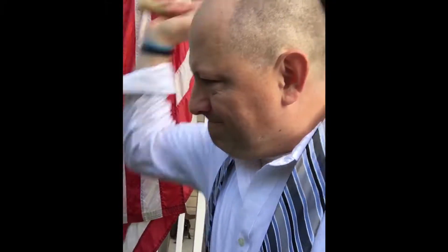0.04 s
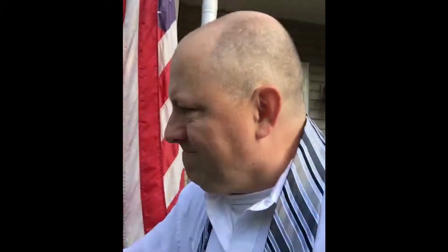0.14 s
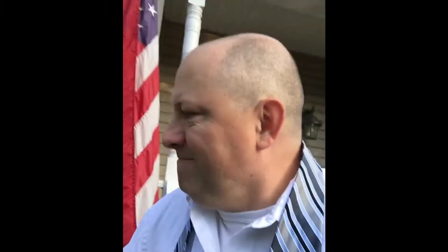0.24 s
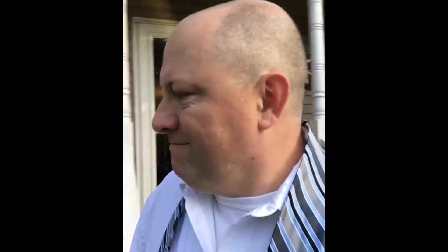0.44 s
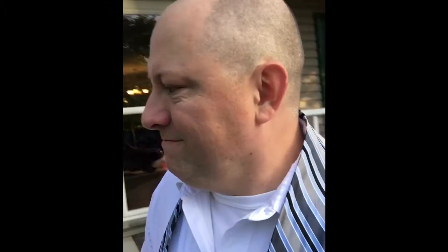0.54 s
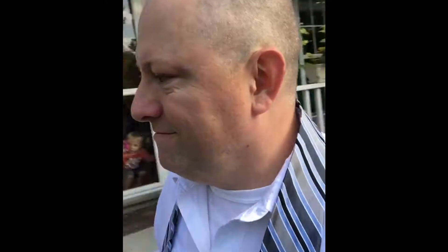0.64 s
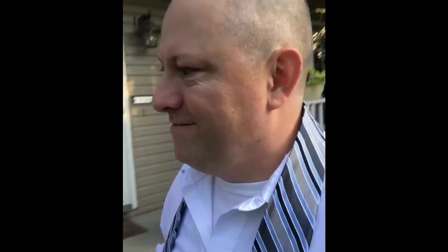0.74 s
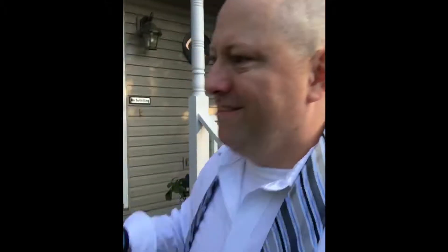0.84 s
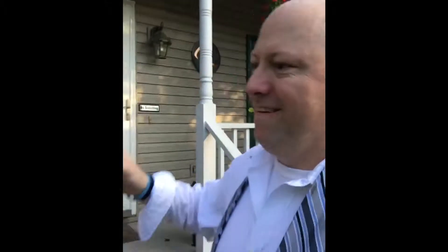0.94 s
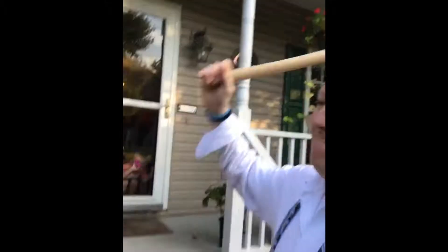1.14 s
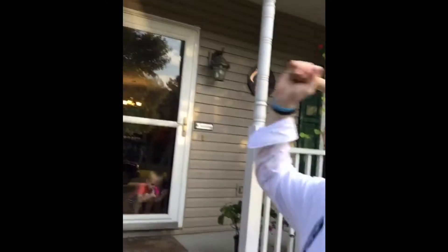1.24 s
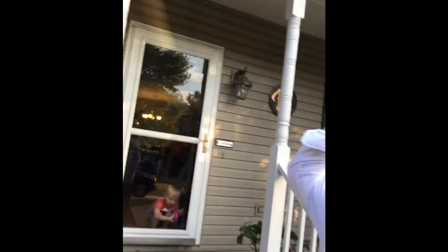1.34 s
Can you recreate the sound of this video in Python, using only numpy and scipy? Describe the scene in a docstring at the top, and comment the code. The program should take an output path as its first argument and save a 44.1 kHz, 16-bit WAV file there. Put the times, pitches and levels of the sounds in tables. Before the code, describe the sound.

Sharp, loud crack of a wooden stick bursting an object on a porch, crickets chirping behind

```python
"""A wooden stick smacks something on a porch, which bursts and scatters: noise bursts plus ringing tones.
Two clear ticks (decaying tones and noise) and a low whoosh (a gliding tone and soft noise) lead to it.
The house throws the blow back as scattered echoes; a spray of noise and random clicks hisses and patters,
a faint clink rings, and something lands with a dull thud (damped tones and low noise).
A cricket trills throughout in short falling chirps, over a faint chorus and quiet outdoor air."""
import sys
import numpy as np
from scipy import signal
from scipy.fft import rfft, irfft
from scipy.io import wavfile
from scipy.ndimage import uniform_filter1d

SR = 44100
rng = np.random.default_rng(int(sys.argv[2]) if len(sys.argv) > 2 else 0)


def store_pcm(level_fs):
    """Save levels as 16-bit WAV."""
    pcm = np.round(np.clip(level_fs, -1, 1) * 32767).astype(np.int16)
    wavfile.write(sys.argv[1], SR, np.atleast_2d(pcm).T)


N = 61739  # length in samples
T = np.arange(N) / SR  # time in seconds

# stages of the smack, contact, full blow, bursting; levels before mixing:
# start_s [s], crack_db [dB], splash_db [dB], ring_db [dB], decay_s [s]
BLOW_STAGES = [(0.2075, -22.5, -19.5, -52, 0.0091), (0.2145, -15.5, -20, -5.5, 0.024),
               (0.2181, -14.5, -31, -16, 0.012), (0.225, -17.5, -16, -28, 0.035)]


def amp(db):
    """Turns decibels into a gain."""
    return 10 ** (np.asarray(db) / 20)


def unit(x):
    """Scales a signal to an rms (average strength) of 1."""
    return x / np.sqrt(np.mean(x ** 2) + 1e-20)


def read(points, hz):
    """Reads a table of (frequency, value) between its points, on a log-frequency axis."""
    f, value = np.transpose(points)
    return np.interp(np.log(hz + 1), np.log(f + 1), value)


def follow(points):
    """Reads a table of (time, level in dB) at every sample."""
    return np.interp(T, *np.transpose(points))


def colour(x, points):
    """Shapes how strong each frequency of a steady sound is, at rms 1."""
    gain = amp(read(points, np.fft.rfftfreq(N, 1 / SR)))
    return unit(irfft(rfft(x) * gain, N))


def noise(points):
    """Makes random noise with the given spectrum."""
    return colour(rng.standard_normal(N), points)


def sine(hz):
    """Makes a tone whose pitch may change, by adding up its frequency over time."""
    return np.sin(2 * np.pi * np.cumsum(hz) / SR)


def struck(start, attack, decay):
    """Envelope of a blow: a quick rise and an exponential fall."""
    age = np.maximum(T - start, 0)
    return (1 - np.exp(-age / attack)) * np.exp(-age / decay)


def wobble(size):
    """Smooth random wandering of rms 1, over about size samples."""
    once = uniform_filter1d(rng.standard_normal(N), size)
    return unit(uniform_filter1d(once, size))


def yard(x):
    """Scattered reflections from the house, each frequency band dying at its own speed."""
    # how long each band takes to fade by 60 dB: pitch_hz [Hz], t60_s [s]
    fade_times = [(100, 0.16), (500, 0.72), (1200, 1), (2400, 1), (4500, 0.93), (8000, 0.32), (15000, 0.62)]
    delay_s, echoes_per_s = .022, 4000
    taps = rng.standard_normal(SR) * (rng.random(SR) < echoes_per_s / SR)
    hz, t, bands = signal.stft(taps, SR, nperseg=256)
    fading = amp(-60 * t / read(fade_times, hz)[:, None])
    tail = signal.istft(bands * fading, SR, nperseg=256)[1]
    # silent until the delay, then full after the same time again
    tail = tail * np.clip(np.arange(len(tail)) / SR / delay_s - 1, 0, 1)
    return signal.fftconvolve(x, tail / np.linalg.norm(tail))[:N]


def cricket():
    """A near cricket's falling chirps, their echo, and a faint chorus in the same band."""
    # level of the near cricket: time_s [s], level_db [dB]
    trill_level = [(0, -49), (.2, -49.5), (.5, -46), (.7, -40.5), (.8, -47), (1.4, -47.5)]
    # spectrum of the chorus: pitch_hz [Hz], relative level_db [dB]
    chorus_spectrum = [(5500, -45), (6550, -17), (6850, 0.5), (7700, -8), (8200, -12), (8900, -37)]
    strokes_per_s, lag_s, limp = 53.4, .003, .09
    stroke_s, middle_hz, fall_hz, spread_db = 0.0081, 7133, 706, 1.2
    beat = (T - lag_s) * strokes_per_s + .07 * wobble(900)
    # the limp makes the gaps between strokes alternate
    beat = np.maximum(beat + limp * np.cos(np.pi * beat), 0)
    # progress through a stroke, 0 to 1, then resting at 1
    along = np.minimum(beat % 1 / strokes_per_s / stroke_s, 1)
    hz = middle_hz + fall_hz * (.5 - along) + 45 * wobble(30)
    # one random strength for each stroke
    strength = amp(spread_db * rng.standard_normal(N))[beat.astype(int)]
    chirps = strength * np.sin(np.pi * along ** 1.02) * sine(hz)
    near = chirps * amp(follow(trill_level))
    return near + amp(-11) * yard(near) + amp(-57) * noise(chorus_spectrum)


def outdoor_air():
    """Quiet, mostly low background noise."""
    # spectrum: pitch_hz [Hz], relative level_db [dB]
    air_spectrum = [(15, -2), (40, 4), (65, 1.5), (95, -11), (135, -7.5), (200, -19), (400, -24.5),
                    (1000, -29.5), (2300, -26.5), (5000, -34.5), (9500, -43), (15000, -35)]
    return amp(-52) * noise(air_spectrum)


def ticks():
    """Short woody clicks as the swing begins: fast-dying tones plus a snap of noise."""
    # each click, levels before mixing: start_s [s], knock_db [dB], snap_db [dB]
    clicks = [(.076, -34.5, -34.5), (0.1213, -24.5, -26.5), (.1274, -47, -35), (.1302, -50, -51)]
    # tones in each knock: pitch_hz [Hz], relative level_db [dB], t60_s [s] (time to fall 60 dB)
    knock_tones = [(1770, -7.5, 0.0047), (2650, 1, 0.0044), (4250, -6.5, 0.0077), (7070, -4.5, 0.0031)]
    # spectrum of the snap: pitch_hz [Hz], relative level_db [dB]
    snap_spectrum = [(200, -31), (900, -11), (2000, 2.5), (4200, -3), (6000, -1), (9000, -4), (13000, -8),
                     (16000, -13)]
    low_cut_hz, snap_decay_s = 590, 0.00037
    dry, snap = np.zeros(N), noise(snap_spectrum)
    for start, knock_db, snap_db in clicks:
        age = np.maximum(T - start, 0)
        for k, (hz, db, t60) in enumerate(knock_tones):
            sign = (-1) ** k
            dry += sign * amp(knock_db + db - 60 * age / t60) * np.sin(2 * np.pi * hz * age)
        # a sharp snap with a weaker, longer tail
        shape = struck(start, .0001, snap_decay_s) + amp(-18) * struck(start, 0.0009, 0.0095)
        dry += amp(snap_db) * snap * shape
    dry = signal.sosfilt(signal.butter(2, low_cut_hz, "high", fs=SR, output="sos"), dry)
    return dry + amp(-14) * yard(dry)


def swing():
    """The stick sheds eddies at a pitch that rises with its speed, and pushes a puff of air."""
    # spectrum of the puff: pitch_hz [Hz], relative level_db [dB]
    puff_spectrum = [(30, 7), (70, 15), (140, 11), (300, -3.5), (600, -7.5), (2200, -6), (4000, -11),
                     (7000, -22), (12000, -17), (16000, -23)]
    middle_s, half_s = 0.193, 0.022  # the tone is at half size half_s before and after the middle
    middle_hz, glide_hz_per_s = 129.35, 250
    puff_s, puff_width_s = 0.195, 0.031
    age = T - middle_s
    hz = middle_hz + glide_hz_per_s * np.clip(age, -.06, .03) + 7 * wobble(200)
    eddies = sine(hz) / (1 + (age / half_s) ** 4)
    puff = np.exp(-((T - puff_s) / puff_width_s) ** 2) * noise(puff_spectrum)
    return amp(-27.5) * eddies + amp(-37.5) * puff


def smack():
    """A crack and a bright splash of noise in quick stages, with ringing tones and echoes."""
    # spectra of the two noises: pitch_hz [Hz], relative level_db [dB]
    crack_spectrum, splash_spectrum = [(60, -2.5), (250, -8.5), (500, -15), (850, -11.5), (1100, -7.5),
                                       (1700, -2.5), (2900, 1), (3500, -7), (4600, 1.5), (5600, -38),
                                       (9000, -10), (16000, -15.5)], [(200, -31), (2000, -4.5), (5000, -4), (7500, -2.5),
                                                      (9300, -3.5), (10200, -6), (12500, 1.5),
                                                      (14500, -1.5), (16000, -5)]
    # what the blow rings with: pitch_hz [Hz], relative level_db [dB], t60_s [s] (time to fall 60 dB)
    ring_tones = [(1008, -9, 0.083), (1584.5, 1.5, 0.087), (1688, -5.5, 0.078), (2632, -21.5, 0.47),
                  (3623, -13.5, 0.18), (4089, -15, 0.15), (4557, -1.5, 0.084), (5300, -16, 0.27)]
    attack_s, grain_db = 0.0016, 1.5
    crack_power, splash_power, ring = np.zeros((3, N))
    for start, crack_db, splash_db, ring_db, decay in BLOW_STAGES:
        shape, age = struck(start, attack_s, decay), np.maximum(T - start, 0)
        crack_power += (amp(crack_db) * shape) ** 2
        splash_power += (amp(splash_db) * shape) ** 2
        rise = 1 - np.exp(-age / attack_s)
        for hz, db, t60 in ring_tones:
            ring += amp(ring_db + db - 60 * age / t60) * np.sin(2 * np.pi * hz * T) * rise
    burst = np.sqrt(crack_power) * noise(crack_spectrum)
    burst += np.sqrt(splash_power) * noise(splash_spectrum)
    burst *= unit(amp(grain_db * wobble(30)))  # rapid roughness
    return burst + amp(-9) * ring + amp(-17) * yard(burst + amp(-21) * ring)


def spray():
    """Fine hiss and thousands of random droplet clicks, with a few larger drops landing."""
    # level of the fine spray: time_s [s], level_db [dB]
    spray_level = [(.22, -50), (.27, -37.5), (.42, -43.5), (.65, -44.5), (.78, -47), (.9, -46), (1.07, -44),
                   (1.25, -47.5), (1.4, -46.5)]
    # spectra of the fine spray and the larger drops: pitch_hz [Hz], relative level_db [dB]
    spray_spectrum, drop_spectrum = [(100, -11), (400, -18), (800, -10), (1400, -3.5), (2400, 3),
                                     (3400, -1.5), (4400, 0), (6000, -2), (9200, 1.5), (10300, -1),
                                     (11800, 0.5), (14000, -1.5), (16000, -9.5)], [(200, -23), (900, -18), (1700, 3.5), (2500, 3),
                                                    (3300, -6), (4400, 1.5), (6000, -2), (9000, -6),
                                                    (16000, -14)]
    # larger drops, level before shaping: start_s [s], level_db [dB]
    large_drops = [(.778, -38), (0.8257, -34.5), (0.832, -37.5), (.944, -39), (1.053, -33), (1.073, -36),
                   (1.132, -41), (1.2069, -31.5)]
    drops_per_s, size_spread_db, flicker_db = 4000, 3.5, .8
    drop_share = 0.46  # part of the power that is droplets; the rest is smooth hiss
    drop_attack_s, drop_decay_s = 0.00036, 0.0022
    sizes_db = size_spread_db * np.minimum(rng.exponential(1, N), 4.5)
    sizes = amp(sizes_db) * rng.choice([-1, 1], N)
    droplets = unit(sizes * (rng.random(N) < drops_per_s / SR))
    mix = np.sqrt(drop_share) * droplets + np.sqrt(1 - drop_share) * rng.standard_normal(N)
    level = amp(follow(spray_level) + flicker_db * wobble(700))
    after_contact = T > BLOW_STAGES[0][0]
    fine = colour(mix, spray_spectrum) * level * after_contact
    landings = sum(amp(db) * struck(s, drop_attack_s, drop_decay_s) for s, db in large_drops)
    return fine + noise(drop_spectrum) * landings


def clink():
    """A piece rings briefly and faintly some way off, as one fading tone."""
    start_s, hz, attack_s, decay_s = 0.424, 1000, 0.0074, 0.036
    return amp(-45.5) * struck(start_s, attack_s, decay_s) * np.sin(2 * np.pi * hz * T)


def thud():
    """Something lands softly, in a few damped low tones mixed with scuffing noise."""
    # dull knocks, level before shaping: start_s [s], level_db [dB], pitch_hz [Hz], decay_s [s]
    knocks = [(.645, -52, 218, 0.018), (1.0372, -35.5, 241.5, 0.019), (1.053, -39, 149, 0.014),
              (1.054, -37.5, 728, 0.014), (1.0645, -47, 485, 0.012), (1.079, -48.5, 202, 0.025)]
    # spectrum of the scuff: pitch_hz [Hz], relative level_db [dB]
    scuff_spectrum = [(60, -10), (250, 1), (450, -4), (800, -3), (1200, -14.5), (3000, -39), (12000, -50)]
    scuff, dry = amp(-8) * noise(scuff_spectrum), np.zeros(N)
    for start, db, hz, decay in knocks:
        tone = np.sin(2 * np.pi * hz * (T - start))
        dry += amp(db) * struck(start, 0.0012, decay) * (tone + scuff)
    return dry + amp(-19.5) * yard(dry)


def scene():
    """Adds all sources together at one microphone."""
    background = cricket() + outdoor_air()
    events = ticks() + swing() + smack() + spray() + clink() + thud()
    return (background + events)[None]


def record(dry):
    """Rounds off loud peaks (soft overload), then removes the very highest frequencies."""
    ceiling, edge_hz = .52, 15850
    rounded = ceiling * np.tanh(dry / ceiling)
    low_pass = signal.firwin(511, edge_hz, window=("kaiser", 9), fs=SR)
    return signal.oaconvolve(rounded, low_pass[None], "same")


dry = scene()
out = record(dry)
store_pcm(out)
```